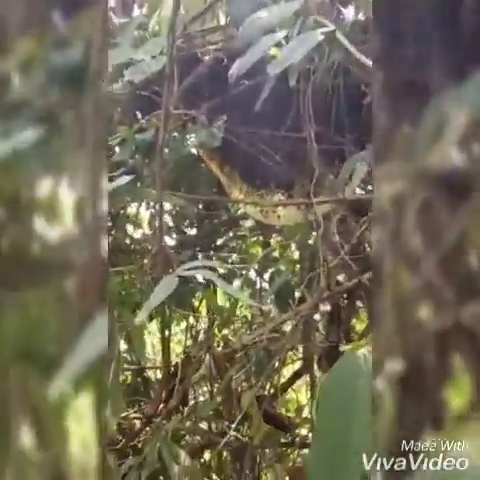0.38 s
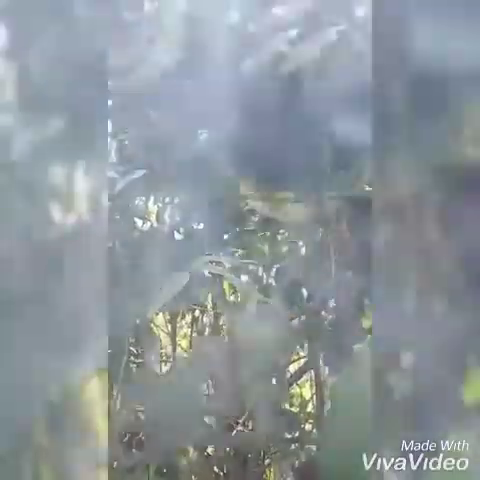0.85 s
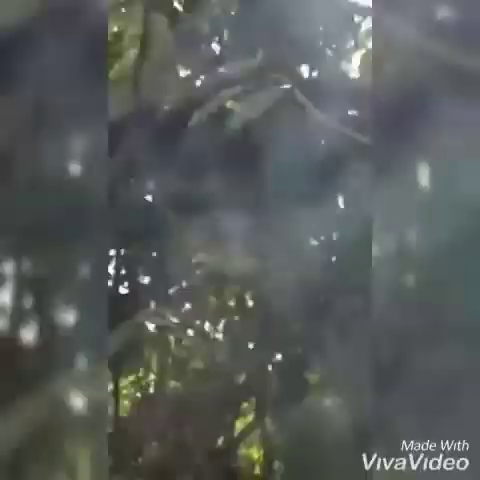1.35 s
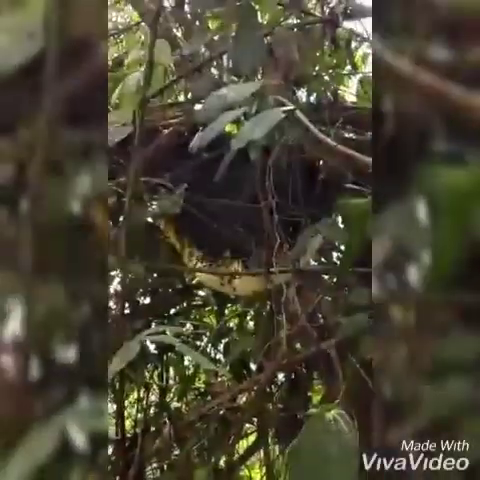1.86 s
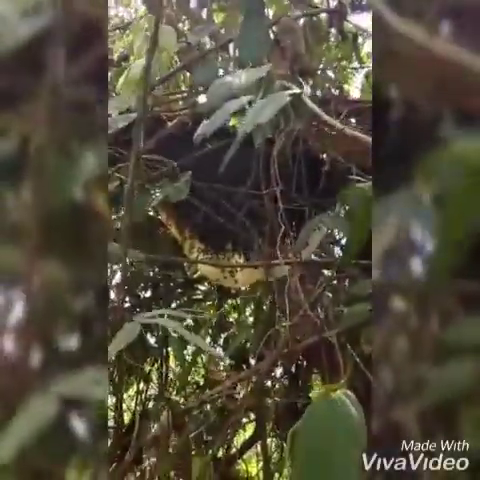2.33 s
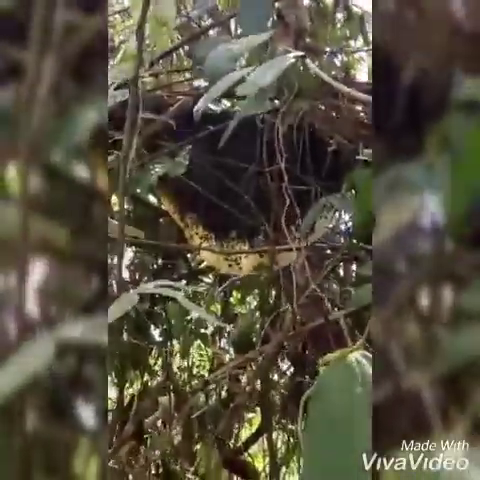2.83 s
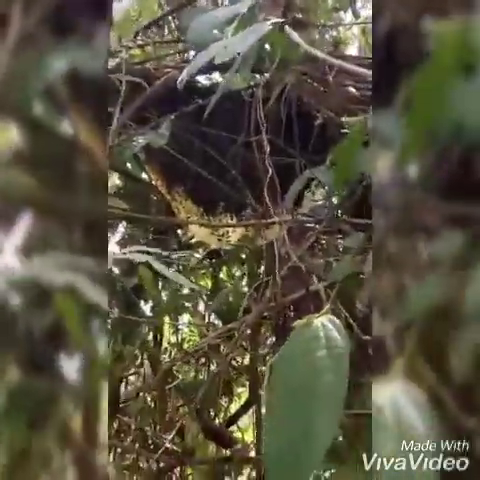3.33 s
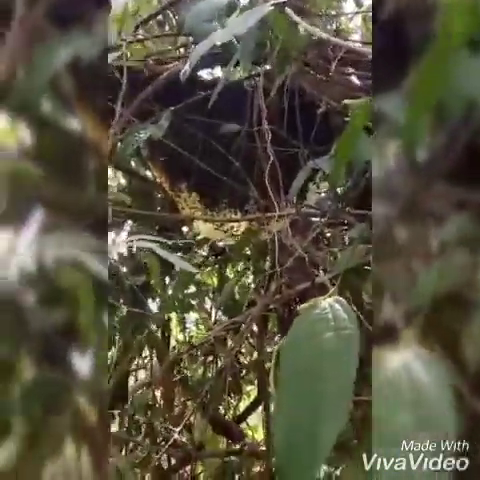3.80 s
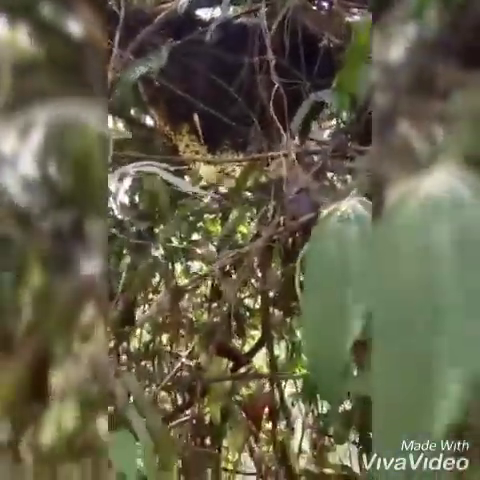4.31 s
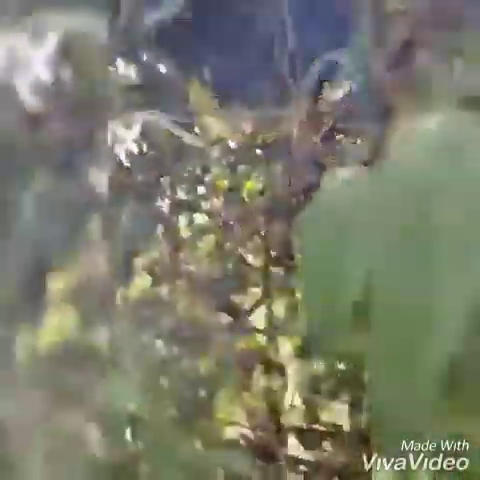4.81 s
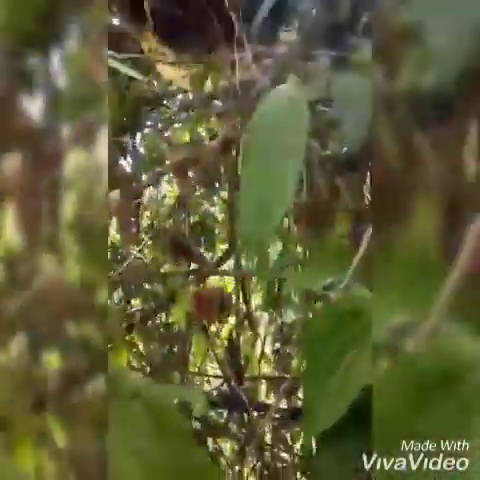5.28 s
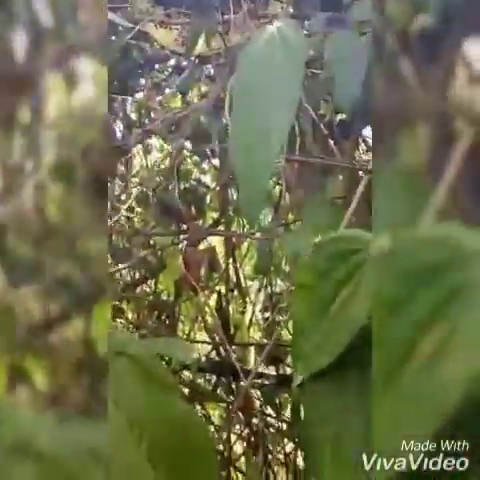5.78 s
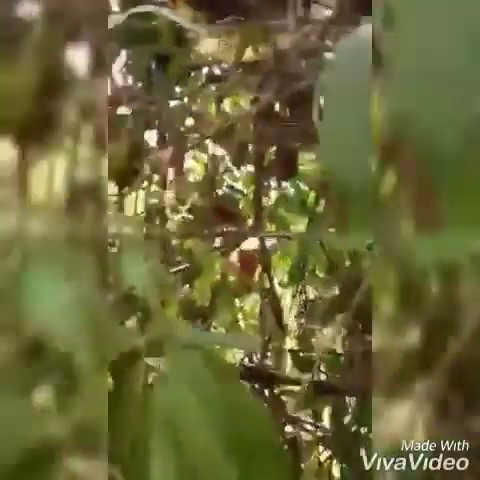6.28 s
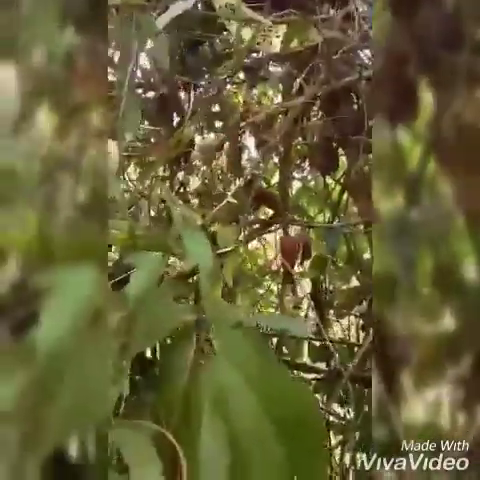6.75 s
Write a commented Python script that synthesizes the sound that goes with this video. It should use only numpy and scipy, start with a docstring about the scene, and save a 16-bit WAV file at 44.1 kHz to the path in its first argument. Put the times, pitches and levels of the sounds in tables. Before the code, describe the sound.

Low insect hum and steady high cicada whine in a forest, then rustling leaves, sharp twig cracks, stick knocks and soft microphone bumps.

```python
"""Someone pushes through dry brush beside a wild bee nest in a forest: torn fibres crack and scatter,
stalks tick, struck sticks ring, and grains of noise make the leaves rustle.
The swarm hums low, from wavering wingbeat harmonics over a murmur of coloured noise.
Soft pushes bump the phone and low noise puffs on its microphone; a small bird gives a row of thin
arched sine chirps, and far cicadas hold a high band of clicks ringing close resonances."""
import sys
import numpy as np
from scipy import signal
from scipy.fft import rfft, irfft
from scipy.io import wavfile
from scipy.ndimage import uniform_filter1d

SR = 44100
rng = np.random.default_rng(int(sys.argv[2]) if len(sys.argv) > 2 else 0)


def convert_level_to_amplitude(level_db):
    """Map a level in decibels to its linear amplitude factor."""
    exponent = np.asarray(level_db, float) / 20
    return 10 ** exponent


def master_out(mix):
    """Clip the mix to full scale and print it as 16-bit PCM to the path in sys.argv[1]."""
    frames = np.transpose(np.atleast_2d(mix))
    ceiling = np.clip(frames, -1, 1)
    pcm = np.round(ceiling * 32767).astype(np.int16)
    wavfile.write(sys.argv[1], SR, pcm)


N = 314874


def curve(rows):
    """Columns of a table joined by straight lines in time."""
    s, *columns = np.transpose(rows)
    return [np.interp(np.arange(N) / SR, s, column) for column in columns]


def unit(x):
    """Scale to rms 1."""
    return x / np.sqrt(np.mean(x ** 2) + 1e-20)


def drift(rate_hz):
    """Slow random wander of rms 1: low-passed noise, drawn every 40 samples and joined by lines."""
    pole = np.exp(-80 * np.pi * rate_hz / SR)
    noise = rng.standard_normal(N // 40 + 2002)
    slow = signal.lfilter([1], [1, -2 * pole, pole * pole], noise)[2000:]   # drop the filter's settling
    return np.interp(np.arange(N) / 40, np.arange(len(slow)), unit(slow))


def band(x, low_hz, high_hz):
    """Butterworth band-pass."""
    return signal.sosfilt(signal.butter(2, [low_hz, high_hz], "band", fs=SR, output="sos"), x)


def resonate(x, hz, width_hz):
    """One resonance with gain 1 on top."""
    r = np.exp(-np.pi * width_hz / SR)
    feedback = [1, -2 * r * np.cos(2 * np.pi * hz / SR), r * r]
    return signal.lfilter(np.array([1, 0, -1]) * (1 - r * r) / 2, feedback, x)


def shaped(x, spectrum):
    """Colour by a spectrum of (Hz, dB per Hz); rms 1."""
    hz, level_db = np.transpose(spectrum)
    grid_hz = np.fft.rfftfreq(N, 1 / SR) + 1
    gain_db = np.interp(np.log(grid_hz), np.log(hz), level_db, left=-80, right=-80)
    return unit(irfft(rfft(x) * convert_level_to_amplitude(gain_db), N))


def patchy(x, spectrum, patch_db, rate_hz):
    """Colour by a spectrum, then let every quarter-octave swell and fade on its own; rms 1."""
    x = shaped(x, spectrum)
    edges = 60 * 2 ** np.arange(0, 7, .25)
    lowest_hz, highest_hz = spectrum[0][0], spectrum[-1][0]
    heard = [(low, high) for low, high in zip(edges, edges[1:]) if lowest_hz < high and low < highest_hz]
    return unit(sum(convert_level_to_amplitude(patch_db * drift(rate_hz)) * band(x, low, high) for low, high in heard))


def grains(spread_db):
    """Dense tiny clicks of very uneven size; rms 1."""
    size_db = spread_db * np.minimum(rng.exponential(1, N), 6)
    return unit(convert_level_to_amplitude(size_db) * rng.choice([-1, 1], N))


def swells(rows):
    """Bell-shaped swells of (top s, level dB, width s) summed into one gain."""
    t = np.arange(N) / SR
    return sum(convert_level_to_amplitude(level_db) * np.exp(-.5 * ((t - s) / width) ** 2) for s, level_db, width in rows)


def add(out, s, sound):
    """Mix a short sound in at a time; what lies before the start is not heard."""
    at = round(s * SR)
    sound = sound[max(-at, 0):N - at]
    out[max(at, 0):max(at, 0) + len(sound)] += sound


def snaps():
    """Fibres tear for some milliseconds; leaves and trunks scatter the cracks into a dying hiss."""
    # twigs breaking: time_s, level_db (relative, middle band), wood_db and top_db (against the middle),
    # scatter_t60_s
    twigs = [(-0.006, -28.5, 2.5, 9.5, 0.19), (0.3404, -54, 8.5, -7, 0.44), (1.144, -43, -3, -7, 0.19),
             (1.371, -47.5, -13, 9, .11), (1.896, -50, -6, -8, 0.71), (2.026, -45.5, -6, -13, 0.25),
             (2.864, -42, -4, 4, 0.33), (2.913, -51, 8, -12, 0.34), (3.02, -38, 0, -4, 0.39),
             (3.0444, -53, 8, -7, 0.35), (3.126, -36, -1, -16, 0.34), (3.3244, -56, 13, -11, .18),
             (3.439, -54, 16.5, -19, 0.71), (3.559, -34, -10, -3, 0.16), (3.8676, -32, -3.5, 2, 0.57),
             (4.018, -33.5, -34, 0.5, 0.23), (4.1267, -12, -14.5, -4, 0.32), (4.377, -45.5, 6.5, -13, 0.16),
             (4.609, -41, -7, -10, 0.12), (4.652, -49, 12.5, -9, 0.15), (4.703, -37.5, -4, -6, 0.2),
             (4.778, -54, 8, -11, .2), (4.791, -47, 11, -9, 0.16), (5.2685, -22.5, -15, -1, 0.2),
             (5.487, -48, 10.5, -9, 0.19), (5.686, -36.5, -4, -7, 0.48), (5.7035, -35, -1, -2, 0.25),
             (5.716, -40, 6, -8, 0.2), (5.753, -41, -10, -7, 0.16), (5.884, -53, 12, -6, 0.15),
             (5.935, -31, -5, 6, 0.37), (5.998, -51, 14, -4, 0.27), (6.011, -49, 6, -8, 0.15),
             (6.09, -25.5, -22, 2, 0.17), (6.1328, -20.5, -1.5, -4, 0.22), (6.196, -39.5, 7.5, -5, 0.29),
             (6.242, -40.5, -9, -7, 0.63), (6.299, -47, 10, -8, 0.27), (6.604, -38, -4, -4, 0.59),
             (6.677, -40.5, -3, 1, 0.56), (6.704, -42, 7, -14, 0.65), (6.736, -41.5, 9.5, -8, 0.35),
             (6.7445, -37.5, -9, 9, 0.44), (6.815, -20.5, -13, -9, 0.23), (6.9525, -33, -13, 2, 0.26),
             (6.976, -25, -15.5, -2, 0.29), (7.005, -49.5, 11.5, -9, 0.36)]
    # resonances that colour the snaps: centre_hz, width_hz, level_db
    colour = [(5000, 12000, -4), (6530, 480, 5), (7970, 770, -8.5)]
    tearing_s, crack_t60_s, rise_s = 0.011, 0.044, 0.0017
    # part, low_hz, high_hz, body_db, scatter_db
    bands = [("mid", 4350, 9160, 0, 4.0), ("wood", 1190, 3040, 0, -6.0),
             ("top", 7500, 12440, 0, -18), ("wood", 450, 1190, -7, -15)]
    t = np.arange(SR // 3) / SR
    after = np.maximum(t - tearing_s, 0)
    rise = np.minimum(t / rise_s, 1)
    crack = convert_level_to_amplitude(-60 * after / crack_t60_s)
    fibres = grains(spread_db=3.4) * convert_level_to_amplitude(1.5 * drift(90))   # the crackle comes in lumps
    out = 0
    for turn, (part, low_hz, high_hz, body_db, scatter_db) in enumerate(bands):
        envelope = np.zeros(N)
        for s, level_db, wood_db, top_db, t60 in twigs:
            part_db = dict(mid=0, wood=wood_db, top=top_db)[part]
            scatter = convert_level_to_amplitude(scatter_db - 60 * after / max(t60, .01))
            add(envelope, s - .001, convert_level_to_amplitude(level_db + part_db + body_db - 15.0) * rise * (crack + scatter))
        gain = 1 / np.std(band(fibres, low_hz, high_hz))
        sign = (-1) ** turn   # the wood bands are flipped against the mid and top bands
        out = out + gain * sign * band(fibres * envelope, low_hz, high_hz)
    for hz, width_hz, level_db in colour:
        out = out + (convert_level_to_amplitude(level_db) - 1) * resonate(out, hz, width_hz)
    return out


def ticks():
    """A thin stalk breaks in one click of a few cycles, with a few splinters after it."""
    # short ticks with a brief splinter tail, alone or within a snap: start_s, peak_db, centre_hz
    stalks = [(1.1487, -36, 6300), (1.3735, -37, 5900), (1.906, -47, 3540), (3.826, -25.5, 4170),
              (3.898, -25.5, 7500), (3.952, -27.5, 5630), (4.1315, -12, 6000), (4.133, -9, 5250),
              (4.519, -39, 2500), (4.5463, -27.5, 1700), (4.547, -28.5, 4000), (4.589, -30.5, 4560),
              (4.589, -35, 730), (4.655, -34, 4000), (4.703, -29, 4160), (4.8133, -26, 3840),
              (4.812, -38, 1320), (4.821, -33.5, 3570), (4.8213, -37.5, 1300), (4.8352, -32, 2730),
              (4.843, -42, 990), (4.989, -34.5, 1630), (4.995, -38, 2520), (5.032, -45, 2000),
              (5.835, -39, 2380), (5.859, -34.5, 1520), (4.547, -39.5, 780), (6.244, -36, 2600),
              (6.771, -35, 5000), (6.1362, -20, 3180), (6.139, -13.5, 3500), (6.7455, -19.5, 5370),
              (6.815, -12.5, 5240), (6.977, -29, 5000), (7.133, -43, 2420), (7.009, -19, 6760)]
    width_share = 0.64   # resonance width as a share of the pitch
    tail_db, tail_t60_s = -20, 0.0088
    out, t = np.zeros(N), np.arange(512) / SR
    splinters = rng.standard_normal((len(stalks), len(t))) * convert_level_to_amplitude(tail_db - 60 * t / tail_t60_s)
    for (s, peak_db, hz), tail in zip(stalks, splinters):
        click = (t == 0) + tail
        for _ in range(2):
            click = resonate(click, hz, width_share * hz)
        add(out, s, convert_level_to_amplitude(peak_db) * click / np.abs(click).max())
    return out


def knocks():
    """A firm hit within a scrape, then loose chatter, sets a stick's bending tone and overtone ringing."""
    # stick on stick: time_s (middle of the scrape), peak_db, ring_hz
    blows = [(0.001, -31, 1130), (4.129, -34.5, 1150), (3.021, -33, 2210), (3.326, -43.5, 1680),
             (4.1295, -18, 1790), (4.13, -34, 389), (4.143, -40, 402), (4.141, -25, 1980),
             (4.558, -47, 1110), (4.993, -36, 407), (5.492, -48, 2030), (5.713, -33, 2250),
             (5.852, -32, 875), (5.853, -38, 1540), (5.926, -39, 910), (6.004, -47, 290),
             (5.936, -34.5, 884), (6.136, -39, 2230), (6.137, -27.5, 1110), (6.135, -32, 485),
             (6.197, -28, 944), (6.202, -31, 417), (6.213, -38, 316), (6.232, -45, 250),
             (6.302, -33.5, 1670), (6.304, -47, 905), (6.384, -36, 1700), (6.411, -37, 1720),
             (6.432, -37, 1700), (6.708, -36.5, 810), (7.115, -42.5, 1780)]
    # thick sticks ring longer: ring_hz, t60_s
    wood_decay = [(140, 0.15), (430, 0.071), (800, 0.02), (2300, 0.014)]
    contact_s, chatter_db, chatter_t60_s = 0.004, -12, 0.07
    t, out = np.arange(SR // 4) / SR, np.zeros(N)
    u = t[:SR // 16]
    size = (len(blows), len(u))
    contacts = 0.2 * rng.standard_normal(size) * convert_level_to_amplitude(3.0 * rng.exponential(1, size))
    scrape = np.exp(-((u - contact_s) / (contact_s / 2)) ** 2)
    chatter = (u > contact_s) * convert_level_to_amplitude(chatter_db - 60 * u / chatter_t60_s)
    contacts = contacts * (scrape + chatter)
    contacts[:, round(contact_s * SR / 2)] += .7   # the firm hit
    for (s, peak_db, hz), contact in zip(blows, contacts):
        decay = convert_level_to_amplitude(-60 * t / np.interp(hz, *np.transpose(wood_decay)))
        overtone = 0.2 * np.sin(2 * np.pi * 1.767 * hz * t) * decay   # dies twice as fast as the tone
        tone = decay * (np.sin(2 * np.pi * hz * t) + overtone)
        ring = band(signal.fftconvolve(tone, contact), hz / 2, hz * 4)
        add(out, s - contact_s, convert_level_to_amplitude(peak_db) * ring / np.abs(ring).max())
    return out


def leaves():
    """Fine grains of rubbing leaves make a dry hiss and a lower rustle, with sparser crackles among them."""
    # how hard the brush is pushed, as the lower rustle: time_s, level_db
    push = [(0.0, -65.5), (0.69, -66), (0.83, -68), (2.76, -69.5), (2.88, -64.5), (3.04, -52),
            (3.24, -57.5), (3.45, -54.5), (3.88, -58), (4.67, -56), (4.84, -55), (4.87, -57.5), (4.97, -62),
            (5.0, -52.5), (5.33, -58), (5.48, -59), (5.52, -62.5), (5.67, -58), (5.73, -51), (5.87, -53),
            (6.24, -50.5), (6.27, -56), (6.31, -51), (6.42, -52.5), (6.66, -57.5), (6.84, -49),
            (7.14, -54.5)]
    # colour of the dry hiss: freq_hz, level_db (per Hz)
    hiss_colour = [(1940, -90), (3300, -25.5), (4380, -12), (4810, -6.5), (5240, -11), (5980, -7.5),
                   (8050, -17), (9750, -13.5), (14900, -23.5), (16000, -15)]
    # colour of the lower rustle: freq_hz, level_db (per Hz)
    swish_colour = [(600, -2), (950, 0), (1400, 0.5), (1900, -1.5), (2350, 1.5), (3000, -6), (3700, -1),
                    (4600, -5), (5800, -26)]
    swish_db, = curve(push)
    hiss_db = -54.5 + 0.43 * (swish_db + 54.5)   # the hiss follows a share of the push's swing
    hiss_db = hiss_db + 0.81 * drift(17) + 1.0 * drift(7.5)
    hiss = convert_level_to_amplitude(hiss_db) * shaped(grains(spread_db=3.0), hiss_colour)
    crackles_per_s = 500 * convert_level_to_amplitude(6 * drift(8))
    crackles = grains(spread_db=4.5) * (rng.random(N) < crackles_per_s / SR)
    crackles = unit(band(crackles, 1400, 8100))
    # the recorder's noise suppression leaves faint rustle in patches
    depth_db = np.clip(-.25 * (swish_db + 52), 1.2, 2.1)
    swish = patchy(grains(spread_db=4), swish_colour, patch_db=depth_db, rate_hz=5)
    return hiss + convert_level_to_amplitude(swish_db) * swish + convert_level_to_amplitude(swish_db - 11) * crackles


def fliers(kind, count=7):
    """Insects on slightly different, wavering wingbeats come and go; together they keep their strength."""
    # big slow fliers, then bees: beat_hz, spread (share of the beat), waver (share of the beat)
    wingbeats = [(141, .04, .035), (268, .08, .05)]
    # harmonics of the wingbeat: multiple, slow_fliers_db, bees_db
    wing_orders = [(1, 5, 1), (2, -1, -14.5), (3, -33, -7.5), (4, -21, -14)]
    beat_hz, spread, waver = wingbeats[kind]
    out = 0
    for offset in np.linspace(-1.5, 1.5, count):
        hz = beat_hz * (1 + spread * offset + waver * drift(3.3))
        phase = 2 * np.pi * np.cumsum(hz) / SR
        nearness = convert_level_to_amplitude(6.05 * drift(4.1))
        wings = sum(convert_level_to_amplitude(levels[kind]) * np.sin(round(k) * phase + k * k) for k, *levels in wing_orders)
        out = out + nearness * wings
    return out / np.sqrt(uniform_filter1d(out ** 2, size=SR // 3))


def swarm():
    """Two kinds of near wingbeat over the blurred murmur of the rest."""
    # nearness of the swarm: time_s, level_db
    swarm_near = [(0.0, -56.5), (0.61, -58.5), (0.73, -59), (1.79, -60), (3.44, -54), (3.7, -56),
                  (4.26, -51), (5.89, -54), (6.01, -50.5), (7.14, -52.5)]
    # nearness of the bees: time_s, level_db
    bees_near = [(0.0, -50), (0.2, -63), (0.6, -54), (0.78, -59), (0.93, -80), (1.1, -59.5), (1.4, -62.5),
                 (1.57, -71), (2.18, -70), (2.3, -67.5), (3.3, -56.5), (5.0, -58), (7.14, -54.5)]
    # low swells near 140 Hz, close passes and a thump at 6.22 s: top_s, level_db
    low_swells = [(0.5, -49.5), (1.21, -60.5), (2.32, -49.5), (3.16, -54), (4.18, -54), (4.42, -51),
                  (5.36, -49), (5.63, -49.5), (6.01, -49.5), (6.22, -41)]
    # the far crowd: freq_hz, level_db (per Hz)
    murmur_colour = [(53, -98), (90, -11), (130, 0), (200, -8.5), (279, -0.5), (407, -10), (587, -5.5),
                     (754, -9), (1100, -26), (1430, -50)]
    near_db, = curve(swarm_near)
    bees_db, = curve(bees_near)
    slow = convert_level_to_amplitude(near_db - 7.5 + 4.5 * drift(6))   # the slow fliers thicken and thin by chance
    slow = np.maximum(slow, swells([(s, level_db, 0.043) for s, level_db in low_swells]))
    bees = convert_level_to_amplitude(bees_db + 2.5 * drift(10.7))
    murmur = patchy(rng.standard_normal(N), murmur_colour, patch_db=2.5, rate_hz=9.9)
    return slow * fliers(kind=0) + bees * fliers(kind=1) + convert_level_to_amplitude(near_db - 1.5) * murmur


def bumps():
    """A hand or branch bumps the phone: each bump is a soft push of about one cycle."""
    # blows on the phone: middle_s, peak_db, pitch_hz
    blows = [(4.169, -51, 75), (4.545, -50, 110), (4.567, -35, 85), (4.68, -46, 55), (6.09, -53, 60),
             (6.264, -40, 70), (6.52, -48, 55), (6.86, -41, 70), (7.098, -36.5, 101)]
    out, cycles = np.zeros(N), 2
    for s, peak_db, hz in blows:
        turn = np.arange(-cycles, cycles, hz / SR)
        push = np.exp(-(turn / 0.37) ** 2 / 2) * np.cos(2 * np.pi * turn)   # half-width 0.37 cycle
        add(out, s - cycles / hz, convert_level_to_amplitude(peak_db) * push)
    return out


def puffs():
    """Lumpy low noise of moving air on the microphone port."""
    # air on the port: top_s, level_db, width_s
    gusts = [(4.56, -52, 0.035), (4.69, -63, 0.051), (6.28, -50, 0.029), (6.52, -55, 0.036),
             (6.87, -53, 0.047), (7.12, -47, 0.041)]
    still_air_db = -80.5
    return (swells(gusts) + convert_level_to_amplitude(still_air_db)) * unit(band(rng.standard_normal(N), 22, 144))


def bird():
    """Near-sine rounded arches with a slight flutter, and a blur of echoes from the trees."""
    # chirps: top_s, top_hz, climb_hz, rise_s, level_db (rms, before flutter and rounding)
    chirps = [(2.894, 7570, 750, 0.024, -51), (3.101, 8350, 500, 0.027, -54),
              (3.283, 8350, 760, 0.042, -53.5), (3.455, 8340, 795, 0.046, -53.5),
              (3.636, 8750, 1210, 0.039, -53.5), (3.813, 8850, 1050, 0.019, -50.5),
              (3.986, 9140, 1060, 0.017, -52), (4.35, 8640, 1190, 0.042, -54.5)]
    fall_s, fall_hz = .031, 1050
    out, flutter = np.zeros(N), convert_level_to_amplitude(4.5 * drift(45) - 2)
    for s, top_hz, climb_hz, rise_s, level_db in chirps:
        t = np.arange(-rise_s, fall_s, 1 / SR)
        away = np.where(t < 0, -t / rise_s, t / fall_s)   # 0 at the top, 1 at either end
        hz = top_hz - np.where(t < 0, climb_hz, fall_hz) * away ** 1.6
        tone = np.sin(2 * np.pi * np.cumsum(hz) / SR)
        add(out, s - rise_s, np.sqrt(2) * convert_level_to_amplitude(level_db) * (1 - away ** 5) * tone)
    t = np.arange(SR // 5) / SR
    echoes = rng.standard_normal(len(t)) * convert_level_to_amplitude(-32 - 60 * t / .22)
    return out * flutter + signal.fftconvolve(out, echoes)[:N]


def cicadas():
    """Many unrelated tymbal clicks ring a cluster of close resonances and throb loosely."""
    # strength of the far band: time_s, level_db
    strength = [(0.0, -59), (1.0, -58), (1.63, -56), (2.34, -58), (2.85, -54), (3.35, -59), (7.14, -57.5)]
    # resonances: centre_hz, width_hz, level_db (relative)
    tymbals = [(4725, 130, -15), (4765, 95, -11.5), (4780, 71, -14), (4894, 110, -12.5), (5000, 16, -13.5)]
    out = 0
    for hz, width_hz, level_db in tymbals:
        ringing = resonate(resonate(grains(spread_db=4), hz, width_hz), hz, width_hz)
        out = out + convert_level_to_amplitude(level_db + 1.0 * drift(0.45)) * unit(ringing)
    return convert_level_to_amplitude(curve(strength)[0] + 0.63 * drift(50)) * unit(out)


def scene():
    """All sources, one channel."""
    brush = snaps() + ticks() + knocks() + leaves()
    return (brush + swarm() + bumps() + puffs() + bird() + cicadas())[None]


def band_limit(x):
    """A steep low-pass at the top of the band."""
    return signal.sosfilt(signal.butter(12, 16660, fs=SR, output="sos"), x)


def record(dry):
    """A phone microphone that loses the deepest bass and the top."""
    heard = signal.sosfilt(signal.butter(2, 65, "high", fs=SR, output="sos"), dry)
    heard = signal.sosfilt(signal.cheby2(18, 40, 15850, fs=SR, output="sos"), heard)
    return band_limit(heard)


dry = scene()
out = record(dry)
master_out(out)
```